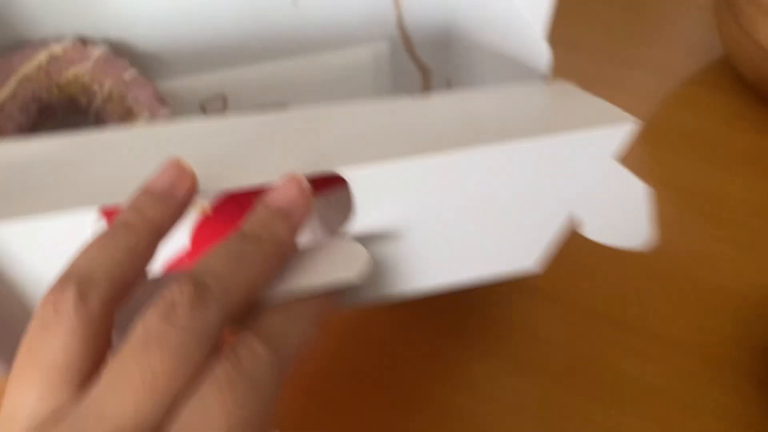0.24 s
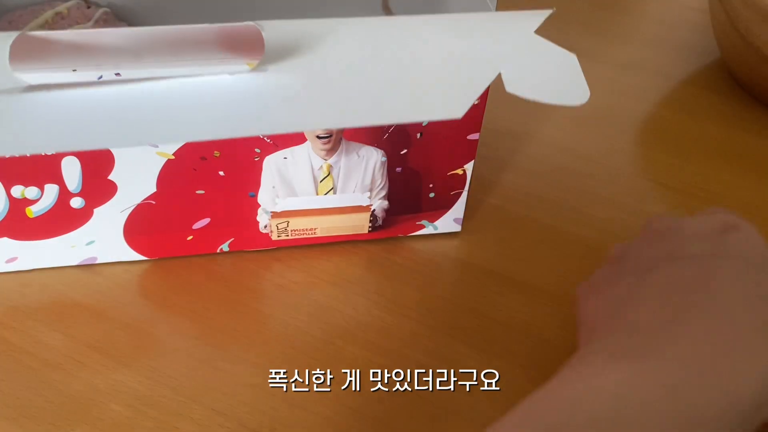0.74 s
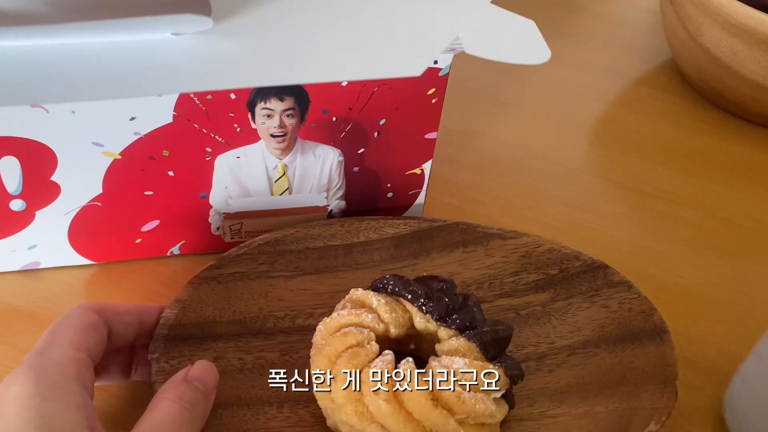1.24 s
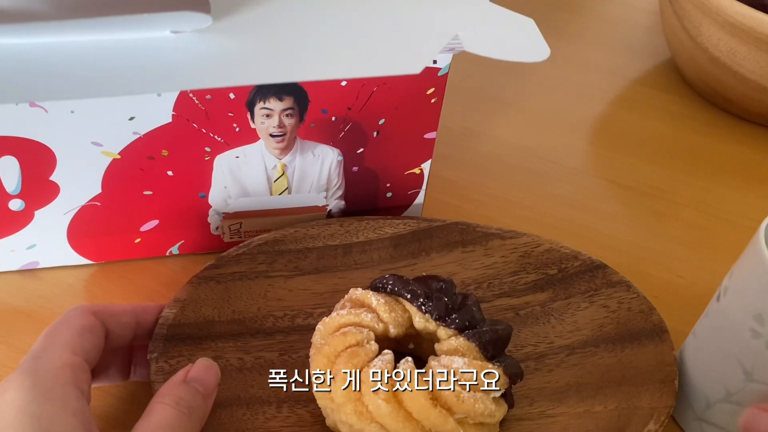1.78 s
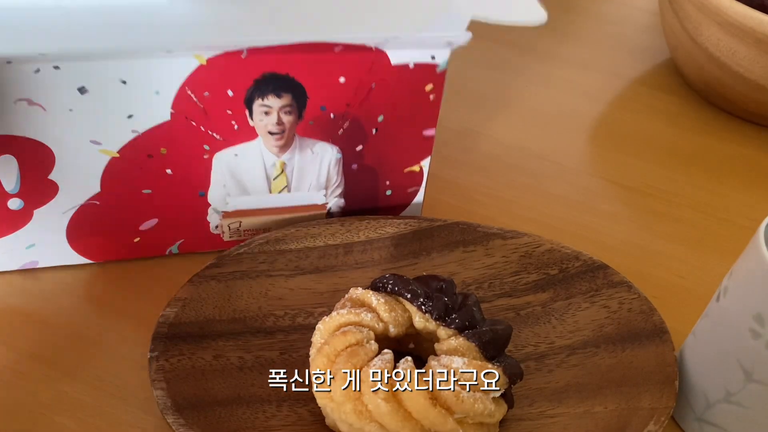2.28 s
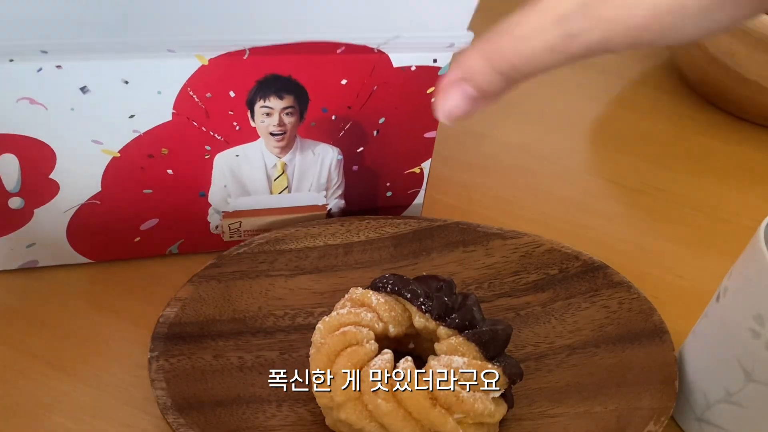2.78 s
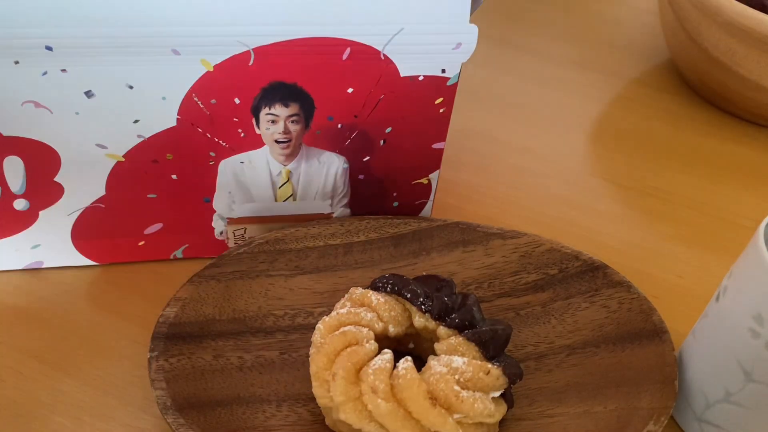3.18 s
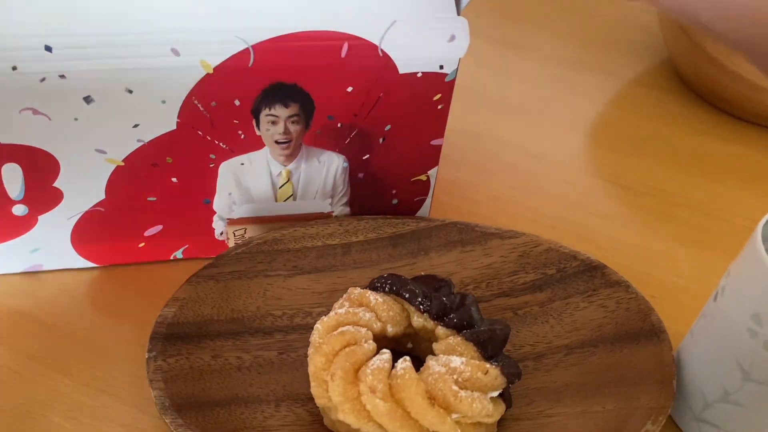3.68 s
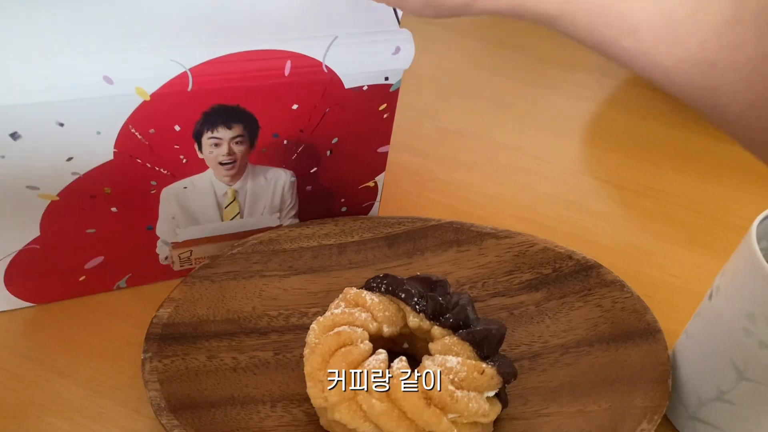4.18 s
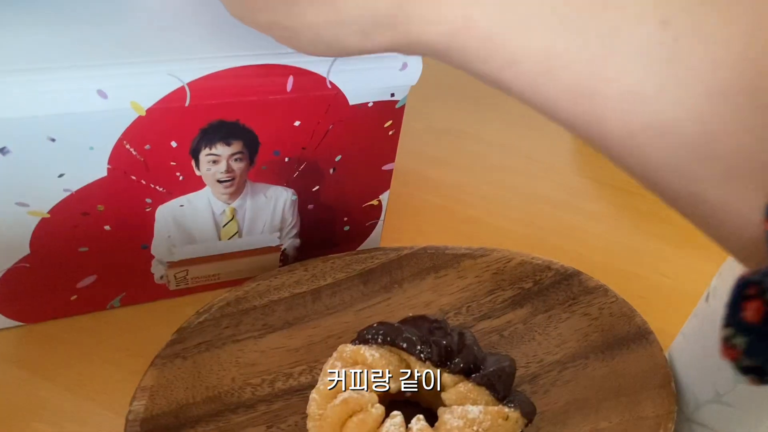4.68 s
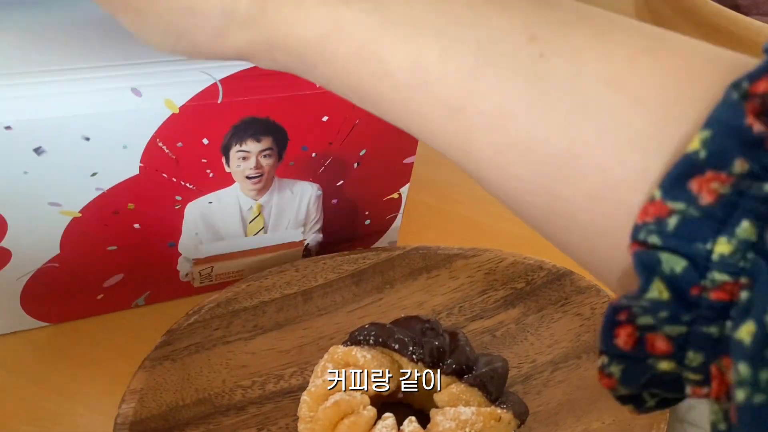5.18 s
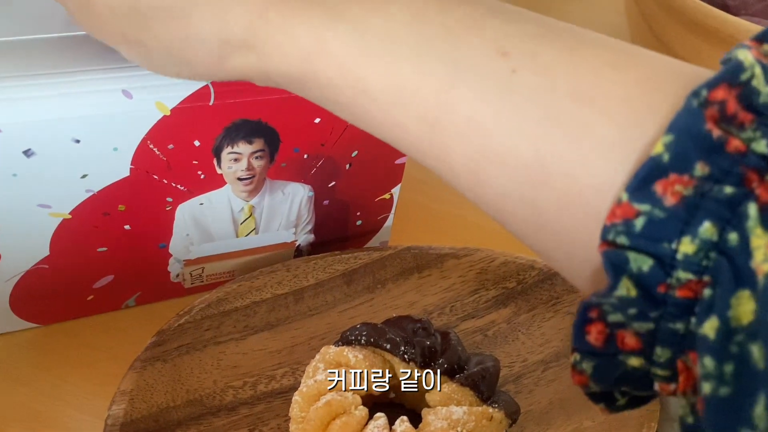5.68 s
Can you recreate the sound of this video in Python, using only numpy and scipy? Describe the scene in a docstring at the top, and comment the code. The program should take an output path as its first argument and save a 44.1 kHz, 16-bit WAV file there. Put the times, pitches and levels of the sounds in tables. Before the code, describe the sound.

Close indoor handling: light card taps and hiss, firm wooden knocks, a pause, then increasingly busy cardboard rustling, snapping and hollow bumps.

```python
"""A cardboard pastry box is folded shut on a wooden table, close to a hand-held phone in a small room.
Creases and taps excite its damped modes: stiff panels, hollow and sway. Fingers and card edges rub by
stick-slip noise, which also gives faint swelling hiss. Soft thumps and one small dull tap are damped tones.
Earlier a wooden plate and a cup are set down, as modal ringing with contact clicks. Early and late
reflections ring briefly over a low rumble of the grip and faint room air, both filtered noise."""
import sys
import numpy as np
from scipy import signal
from scipy.fft import rfft, irfft, next_fast_len
from scipy.io import wavfile
from scipy.ndimage import uniform_filter1d

SR = 44100
rng = np.random.default_rng(int(sys.argv[2]) if len(sys.argv) > 2 else 0)


def wav_out(sig):
    """Save sig, one row per channel (or a flat mono array), as 16-bit PCM at SR to the path in sys.argv[1]."""
    wavfile.write(sys.argv[1], SR, np.round(np.clip(np.atleast_2d(sig).T, -1, 1) * 32767).astype(np.int16))


N = 261513  # samples
TIME = np.arange(N) / SR  # s
RING = np.arange(SR // 2) / SR  # half a second, the span of every blow and echo pattern [s]
SIDES = np.array([[1], [-1]])  # left, right


def undb(db):
    """Logarithmic level: 20 dB is a tenfold amplitude."""
    return 10 ** (np.asarray(db) / 20)


def fade(t60):
    """Exponential free decay: the level falls 60 dB in t60 seconds."""
    return np.exp(-np.log(1000) * RING / max(t60, 1e-3))


def unit(x):
    """Energy normalisation: scale to rms 1."""
    return x / np.sqrt(np.mean(x ** 2))


def burst(x, db, size=882):
    """Short-time energy: the loudest stretch of `size` samples gets this rms level."""
    power = uniform_filter1d(np.mean(x ** 2, axis=0), size)
    return x * undb(db) / np.sqrt(power.max())


def pan(db):
    """Interchannel level difference: left and right gains that lie db apart."""
    return undb(db * SIDES / 2)


def pair(x, apart):
    """Interchannel coherence: a shared signal plus an unrelated one in opposite polarity."""
    return x[0] + apart * x[1] * SIDES


def colour(x, points):
    """Minimum-phase filtering: a causal response through (frequency [Hz], gain [dB]) points."""
    size = 2 * next_fast_len(x.shape[-1])
    half = size // 2
    hz, db = np.transpose(points)
    log_hz = np.log(np.arange(half + 1) * SR / size + 1)
    below = np.maximum(np.log(hz[0]) - log_hz, 0)
    above = np.maximum(log_hz - np.log(hz[-1]), 0)
    gain_db = np.interp(log_hz, np.log(hz), db)
    # outside the points the gain falls about 12 dB per octave
    cepstrum = irfft(np.log(undb(gain_db)) - 2 * (below + above))
    # folding the cepstrum forward in time makes the filter causal
    cepstrum[1:half] *= 2
    cepstrum[half + 1:] = 0
    response = np.exp(rfft(cepstrum))
    return irfft(rfft(x, size) * response)[..., :x.shape[-1]]


def walk(rate):
    """Slow random modulation: values held 1 / rate seconds, smoothed twice, with rms near 1."""
    hold = int(SR / rate)
    steps = np.repeat(rng.standard_normal(N // hold + 1), hold)
    smooth = uniform_filter1d(uniform_filter1d(steps, hold), hold)
    return unit(smooth[:N])


def ring(modes, detune, scatter_db, apart, length=1):
    """Modal superposition: each blow randomly shifts the strengths, signs and pitches of damped sines."""
    out = 0
    for hz, db, t60 in modes:
        shift, size, sign, turn = rng.standard_normal(4)
        phase = 2 * np.pi * hz * (1 + detune * shift) * RING + apart * turn * SIDES
        strength = np.sign(sign) * undb(db + scatter_db * size)
        onset = 1 - np.exp(-2 * hz * RING)
        out = out + strength * fade(t60 * length) * onset * np.sin(phase)
    return out


def crack(t60, points, apart):
    """High modal density: modes too crowded to tell apart sound as a quickly dying noise burst."""
    noise = pair(rng.standard_normal((2, len(RING))), apart)
    return colour(noise * fade(t60), points)


def add(track, s, sound):
    """Linear superposition: lay a sound on the track at s seconds."""
    start = max(int(s * SR), 0)
    track[:, start:start + sound.shape[1]] += sound[:, :N - start]


# sway of the box on the table, its hollow and its stiff panels, before random scatter:
# (frequency [Hz], relative level [dB], t60 [s])
BOX_SWAY_MODES = [(64, -8, 0.16), (98.8, -4.5, 0.13), (135, -1.5, 0.18), (179, -12, 0.14)]
BOX_HOLLOW_MODES = [(247, -13, 0.12), (324.7, -1.5, 0.11), (368.2, -3, 0.088), (436.7, 2.5, 0.079),
                    (548, 0.5, 0.054), (625, -8, 0.078)]
BOX_PANEL_MODES = [(730, -12, 0.095), (870, -4.5, 0.044), (1037, 0.5, 0.03), (1246, -5.5, 0.019),
                   (1560, -7, 0.0053), (1618, 6.5, 0.02), (2052, -7.5, 0.037), (2307, -5.5, 0.016)]
# dense, dead response of flat card, and spectrum of a snap: (frequency [Hz], gain [dB])
CARD_SLAP = [(400, 2), (700, 3.5), (1050, 7), (1400, -5), (1700, -8.5), (2400, 0), (3200, -12)]
CARD_SNAP = [(500, -17), (1000, -11), (2400, 5), (3100, 1.5), (3800, 2), (5500, -5.5), (8000, -5.5),
             (12000, -11), (16000, -16.5)]


def box_blow(snap_db, panel_db, flat_db, hollow_db, sway_db, crumple):
    """Impulsive excitation: a swelling cluster of tiny snaps drives panels, hollow and whole box."""
    age = RING / max(crumple, 1e-4)  # in contact times
    fibres = pair(rng.standard_normal((2, len(RING))), apart=0.75)
    fibres = fibres * undb(1.75 * rng.standard_normal(len(RING)))
    # ragged clumps: random levels at 675 points per second
    clumps = np.interp(RING * 675, np.arange(1000), rng.standard_normal(1000))
    cluster = fibres * undb(3 * clumps) * np.sqrt(age) * np.exp(-age)
    snap = burst(colour(cluster, CARD_SNAP), snap_db + 1.5, size=256)
    # flatness trades panel ring for slap
    panel = ring(BOX_PANEL_MODES, detune=0.07, scatter_db=3.0, apart=0.88)
    panel = burst(panel, panel_db - 0.5 - flat_db / 2, size=512)
    slap = burst(crack(0.034, CARD_SLAP, apart=0.75), panel_db - 3 + flat_db / 2, size=512)
    hollow = burst(ring(BOX_HOLLOW_MODES, detune=0.043, scatter_db=0.5, apart=0.4), hollow_db)
    sway = burst(ring(BOX_SWAY_MODES, detune=0.09, scatter_db=2.0, apart=0.18), sway_db + 1)
    push = 1 - np.exp(-age)  # a slow crease loads the panels gently
    heave = 1 - np.exp(-(age / 0.77) ** 2)  # hollow and sway build up more gradually at first
    return snap + push * (panel + slap) + heave * (hollow + sway)


# creases giving way; nominal levels, before the trims in box_blow:
# (time [s], snap level [dB], panel level [dB], crumple time [s])
CREASE_EVENTS = [(2.18, -53, -42.5, 0.0036), (2.203, -41, -40, 0.0031), (2.2239, -31.5, -34, 0.0018),
                 (2.264, -31.5, -35.5, 0.0013), (3.238, -42.5, -41.5, 0.0025), (3.498, -51, -48.5, 0.0045),
                 (3.906, -34, -22, 0.0072), (3.946, -39, -30.5, 0.0058), (4.068, -53.5, -41, 0.0046),
                 (4.444, -41.5, -46, 0.0027), (4.988, -49.5, -38.5, .0038), (5.178, -36, -28, 0.0048),
                 (5.393, -44, -52, 0.0012), (5.457, -55, -60, .0014), (5.511, -35.5, -36.5, .0025),
                 (5.523, -30.5, -38, 0.0023), (5.55, -39.5, -33, 0.013), (5.698, -40.5, -49, 0.0031),
                 (5.821, -38.5, -46, 0.0078), (5.8346, -27.5, -40.5, 0.0014)]


def creases():
    """Buckling: card gives way suddenly with a snap, and the box answers."""
    out = np.zeros((2, N))
    for s, snap_db, box_db, crumple in CREASE_EVENTS:
        blow = box_blow(snap_db, box_db, flat_db=3, hollow_db=box_db - 2, sway_db=box_db - 9.5,
                        crumple=crumple)
        add(out, s, blow * pan(6.5))
    return out


# fingers and flaps striking the box; nominal levels, before the trims in box_blow:
# (time [s], hollow level [dB], hardness = panels over hollow [dB],
#  flatness = slap over panel ring [dB], contact time [s])
TAP_EVENTS = [(0.2929, -38.5, 7, 9.5, 0.00045), (0.34, -41.5, -11, 1, 0.0016), (2.949, -41.5, -3, 0, 0.005),
              (3.0949, -36, 2, 11, 0.0017), (3.6392, -26, -2.5, 5, 0.0035), (3.8869, -31.5, -6, 2, 0.0022),
              (3.926, -27, -7.5, 6, 0.0067), (4.274, -30.5, 3.5, 3, 0.0012),
              (4.335, -26.5, -11.5, -1, 0.0013), (4.397, -31, -5, 6, 0.0033),
              (4.548, -36.5, -7.5, -14, 0.0031), (4.582, -37.5, -6.5, 6, 0.0028),
              (4.883, -37, -3, -8, 0.0033), (4.908, -26, -11, -11, 0.0047), (5.2134, -19, -5, -4, 0.0024),
              (5.229, -23.5, -5.5, -12.5, 0.001), (5.626, -30, -2, 3, 0.0043), (5.788, -30.5, -13, 4, 0.01)]


def taps():
    """Contact stiffness: the harder the tap, the more it sounds the panels against the hollow."""
    out = np.zeros((2, N))
    for s, hollow_db, hardness_db, flat_db, contact in TAP_EVENTS:
        panel_db = hollow_db + hardness_db
        blow = box_blow(panel_db - 7.5, panel_db, flat_db, hollow_db, hollow_db - 12, contact)
        add(out, s, blow * pan(4.5))
    return out


def wander(x, depth_db):
    """Time-varying transfer: resonances randomly come and go across frequency and time."""
    cells = signal.stft(x, nperseg=512)[2]
    field = rng.standard_normal(cells.shape[1:])
    for _ in range(2):
        field = uniform_filter1d(field, size=7, axis=0)  # across frequency
        field = uniform_filter1d(field, size=9, axis=1)  # across time
    return signal.istft(cells * undb(depth_db * unit(field)))[1][:, :N]


def friction(points, slips_per_s, grain_db, smooth, flutter_db, apart):
    """Stick-slip friction: many small random releases over a smooth scrape, with a fluttering level."""
    slips = (rng.random((2, N)) < slips_per_s / SR) * rng.choice([-1, 1], (2, N))
    sizes = np.minimum(rng.exponential(size=(2, N)), 4)
    slips = slips * undb(grain_db * sizes)
    scrape = unit(slips) + smooth * rng.standard_normal((2, N))
    moving = wander(colour(pair(scrape, apart), points), depth_db=2.0)
    return unit(moving * undb(flutter_db * walk(45)))


def swell(s, length, swell_db):
    """Amplitude envelope: the sound takes hold, swells or eases, and lets go."""
    along = (TIME - s) / length
    hold = np.clip(along / 0.14, 0, 1)
    release = np.clip(1 - (along - 1) / 0.34, 0, 1) ** 2  # dies away past the nominal length
    return hold * release * undb(swell_db * (np.clip(along, 0, 1) - 0.5))


# drone in the hollow, rasp of card edges, hiss, and single paper fibres letting go:
# (frequency [Hz], gain [dB])
DRAG_SPECTRUM = [(130, -10), (250, 1), (340, 1.5), (460, 1.5), (650, -10), (900, -15.5), (1400, -26.5)]
RASP_SPECTRUM = [(500, -21), (900, 10.5), (1300, -8), (1650, 4), (2400, 0), (3000, -1.5), (3900, -6.5),
                 (5200, -5.5), (8000, -35)]
HISS_SPECTRUM = [(2500, -2), (4500, -0.5), (6000, -5), (7500, -1.5), (10000, -5), (13000, -7),
                 (16000, -7.5)]
CRINKLE_SPECTRUM = [(600, -2), (1100, 19), (2400, -0.5), (3800, 5.5), (5500, -7), (8000, -4), (16000, -28)]
# faint hiss swelling and fading, and strokes of skin or card over card:
# (time [s], length before release [s], mid-way rasp level [dB], mid-way hiss level [dB],
#  swell from start to end [dB])
HISS_AND_STROKES = [(-.04, 0.39, -63, -51, -5), (0.427, .36, -69, -71.5, -2), (0.92, 0.18, -58.5, -68.5, 6),
                    (1.121, 0.037, -56, -54.5, 11), (1.17, 0.17, -75, -79, 7),
                    (2.531, 0.044, -60.5, -74, -9), (2.685, 0.17, -69, -62.5, 2),
                    (2.933, 0.1, -61.5, -54.5, -2), (3.182, 0.16, -62.5, -58.5, 0),
                    (3.425, 0.32, -60.5, -63, 11), (3.767, 0.16, -71.5, -61.5, 23),
                    (3.918, 0.16, -49, -53.5, -23), (4.2, 0.16, -49, -57, 1.5), (4.507, 0.13, -83, -57, 2),
                    (4.681, 0.06, -58, -54.5, 2), (4.842, 0.093, -54, -60, 11),
                    (4.957, 0.29, -48, -55.5, 3.5), (5.163, 0.017, -52, -44, 5),
                    (5.543, 0.063, -53, -44, -12), (5.718, 0.031, -51.5, -61, 2),
                    (5.792, 0.14, -52, -55.5, 8)]
# how hard the hands press while folding the box shut: (time [s], reference level [dB])
HAND_PRESSURE = [(2.53, -54.5), (2.73, -59.5), (3.1, -46.5), (3.29, -59), (3.5, -54), (3.77, -55),
                 (3.85, -46.5), (4.32, -55.5), (4.42, -43.5), (4.67, -50), (4.93, -60), (5.08, -42),
                 (5.14, -53), (5.29, -70), (5.56, -39), (5.7, -48.5), (5.93, -46.5)]


def rubbing():
    """Frictional excitation: card hisses, rasps, crinkles and drones; faint hiss also swells and fades."""
    drag = friction(DRAG_SPECTRUM, slips_per_s=200, grain_db=3.0, smooth=0.66, flutter_db=-0.2, apart=0.44)
    rasp = friction(RASP_SPECTRUM, slips_per_s=900, grain_db=2.0, smooth=1.0, flutter_db=3.0, apart=0.97)
    hiss = friction(HISS_SPECTRUM, slips_per_s=1900, grain_db=3.0, smooth=1.5, flutter_db=2.0, apart=0.91)
    crinkle = friction(CRINKLE_SPECTRUM, slips_per_s=80, grain_db=1.0, smooth=0, flutter_db=3.0, apart=0.48)
    rasping, hissing = 0, 0
    for s, length, rasp_db, hiss_db, swell_db in HISS_AND_STROKES:
        gain = swell(s, length, swell_db)
        rasping = rasping + gain * undb(rasp_db)
        hissing = hissing + gain * undb(hiss_db)
    folding = TIME >= HAND_PRESSURE[0][0]  # folded card crinkles too
    press = folding * undb(np.interp(TIME, *np.transpose(HAND_PRESSURE)))
    edges = rasp * pan(3.0) + folding * undb(-8) * crinkle * pan(5.9)
    # the listed swells and the resting hands add in power
    drag_gain = np.hypot(rasping * undb(1.5), press * undb(-1.5))
    edge_gain = np.hypot(rasping, press * undb(-11.5))
    hiss_gain = np.hypot(hissing, press * undb(-15))
    return drag * pan(3.2) * drag_gain + edges * edge_gain + hiss * pan(5.0) * hiss_gain


# plate and table top, before random scatter and each landing's damping:
# (frequency [Hz], relative level [dB], nominal t60 [s])
WOOD_MODES = [(88, -11, .2), (135, -4, .3), (240, -1, .14), (272, 3, .14), (310, 1, .2), (395, -3, .2),
              (465, -2, .22), (603, -4, .2), (689, -4, .18), (790, -5, .14), (851, 0, .22), (928, 1, .18),
              (1035, -2, .15), (1110, -2, .2), (1211, -2, .2), (1310, -7, .12), (1410, -7, .18),
              (1513, -7, .2), (1626, -8, .2), (1765, -7, .2), (1863, -8, .14)]
# dense, quickly damped modes of the wood: (frequency [Hz], gain [dB])
WOOD_SPECTRUM = [(400, -33), (600, 1.5), (900, 0), (1250, -0.5), (1750, -10), (2200, -18), (2700, -17),
                 (3400, -32)]


def landing(wood_db, thump_db, length):
    """Modal excitation by impact: one contact rings the plate and thumps the table top."""
    top = [mode for mode in WOOD_MODES if mode[0] < 530]
    plate = [mode for mode in WOOD_MODES if mode[0] >= 530]
    thump = ring(top, detune=0.034, scatter_db=-1.5, apart=0.078, length=0.8 * length)
    tone = ring(plate, detune=0.011, scatter_db=1.0, apart=0.97, length=1.48 * length)
    wood = crack(0.019, WOOD_SPECTRUM, apart=0.7)
    return burst(thump, thump_db + 0.5) + burst(tone, wood_db - 8.5) + burst(wood, wood_db - 0.5)


def damped_tone(hz, db, t60):
    """Single-degree-of-freedom oscillation: one short sine sets in softly and decays."""
    onset = 1 - np.exp(-hz * RING)
    return burst(np.sin(2 * np.pi * hz * RING) * onset * fade(t60) * pan(3.2), db)


# plate, cup and box landing on the table; wood level is nominal, before the trims in landing:
# (time [s], wood level [dB], click level [dB], ring time as a nominal share of the modes' t60 [1],
#  left minus right [dB])
LANDINGS = [(0.7186, -53.5, -52.5, 0.36, 0), (0.841, -52.5, -54, 0.22, -5), (0.849, -47, -43.5, 0.17, 6),
            (0.86, -31, -41.5, 0.54, 1.5), (1.3485, -17, -35.5, 0.32, 1), (1.386, -30.5, -56, 1, 3),
            (1.5324, -25.5, -56, 0.38, 1.5), (1.9622, -43.5, -66, 0.27, 4), (4.277, -29, -41, 0.68, 0),
            (5.233, -41, -45, 0.49, -8)]
# click of contact: (frequency [Hz], gain [dB])
CLICK_SPECTRUM = [(1500, -27), (2600, -1.5), (3400, -8), (3900, -1), (4600, -13), (5200, -7.5),
                  (6500, -17.5), (10000, -22), (16000, -30)]


def knocks():
    """Repeated impact: each thing lands with a click, then rocks once onto its far edge, softer."""
    out = np.zeros((2, N))
    for s, wood_db, click_db, length, pan_db in LANDINGS:
        # softer landings are more thump than ring
        thump_db = wood_db + 0.18 * (-24 - wood_db)
        click = burst(crack(0.015, CLICK_SPECTRUM, apart=0.56), click_db, size=220)
        add(out, s, (landing(wood_db, thump_db, length) + click) * pan(pan_db))
        # a landing also swings the whole table
        add(out, s, damped_tone(hz=75, db=thump_db - 18, t60=0.15))
        rock = landing(wood_db - 2.5, thump_db - 3, length)
        add(out, s + 0.009, rock * pan(pan_db))
    return out


# ringing of the cup: (frequency [Hz], level [dB], t60 [s])
CUP_RING_MODES = [(3930, -42.5, 0.029), (4400, -46, .012)]


def cup_tick():
    """Free vibration: the cup ticks once as it settles."""
    out = np.zeros((2, N))
    add(out, 1.4497, ring(CUP_RING_MODES, detune=0, scatter_db=0, apart=0))
    return out


# soft low thumps and one small dull tap: (time [s], frequency [Hz], level [dB], t60 [s])
SOFT_THUMPS = [(0.343, 70, -42, 0.1), (0.346, 190, -37, 0.053), (0.72, 64.4, -52, 0.14),
               (1.704, 460, -49, 0.041), (2.205, 62.5, -57, 0.22), (2.661, 68, -40.5, 0.081),
               (2.952, 227, -44.5, 0.067), (3.1, 58.3, -39.5, 0.15), (3.182, 249, -46.5, .1),
               (3.285, 65, -43.5, 0.15), (3.506, 55.4, -38, 0.11), (3.66, 76, -38.5, 0.22),
               (3.895, 70.4, -27, 0.057), (3.932, 102, -35.5, 0.18), (5.186, 140, -30, 0.034),
               (5.392, 91.7, -42, 0.072)]


def soft_thumps():
    """Damped oscillation: soft low thumps and one small dull tap, each a short tone without a click."""
    out = np.zeros((2, N))
    for s, hz, db, t60 in SOFT_THUMPS:
        add(out, s, damped_tone(hz, db, t60))
    return out


# rumble of the hand that holds the phone, before an overall 5 dB lift: (time [s], level [dB])
GRIP_LEVELS = [(0.0, -59), (0.36, -56), (0.59, -60), (2.49, -54.5), (2.71, -61.5), (3.15, -48.5),
               (3.34, -60), (3.58, -52.5), (3.8, -54), (4.36, -47.5), (4.76, -50.5), (5.09, -51.5),
               (5.93, -53)]
# rumble of the grip: (frequency [Hz], gain [dB])
RUMBLE_SPECTRUM = [(22, -32), (35, -11.5), (52, 2.5), (75, -1.5), (110, -3.5), (160, -4), (230, -11),
                   (400, -25)]


def grip_rumble():
    """Structure-borne sound: the grip rumbles through the phone's body as low, uneven noise."""
    noise = pair(rng.standard_normal((2, N)), apart=0.19)
    rumble = unit(colour(noise, RUMBLE_SPECTRUM)) * pan(1.8)
    return rumble * undb(np.interp(TIME, *np.transpose(GRIP_LEVELS)) + 5)


# air of the still room: (frequency [Hz], gain [dB])
AIR_SPECTRUM = [(25, 2.5), (55, -8), (120, -7), (300, -4), (500, -11.5), (1000, -13.5), (2000, -24.5),
                (5000, -33.5), (8000, -46.5), (16000, -42)]


def room_air():
    """Diffuse-field noise: the room murmurs faintly and steadily."""
    noise = pair(rng.standard_normal((2, N)), apart=1.0)
    return unit(colour(noise, AIR_SPECTRUM)) * pan(3.9) * undb(-59)


def room(x, early_db, late_db, early_t60, late_t60=0.72):
    """Reverberation: close reflections from table and walls, then a longer, duller tail."""
    out = x
    parts = [(early_db, early_t60, 0.004, -5), (late_db, late_t60, 0.02, -16)]
    for db, t60, onset, treble_db in parts:
        echoes = pair(rng.standard_normal((2, len(RING))), apart=0.7)
        echoes = echoes * fade(t60) * (1 - np.exp(-(RING / onset) ** 2))
        spectrum = [(60, -21.5), (400, -0.5), (1200, 2), (4000, -1.0), (16000, treble_db)]
        echoes = colour(unit(echoes) / np.sqrt(len(RING)), spectrum)
        out = out + undb(db) * signal.fftconvolve(x, echoes, axes=1)[:, :N]
    return out


def scene():
    """Direct-to-reverberant ratio: the table excites early echoes more than box or rubbed card does."""
    box = room(creases() + taps(), early_db=-7.5, late_db=-17.0, early_t60=0.15)
    card = room(rubbing(), early_db=-12.0, late_db=-20, early_t60=0.031)
    table = room(knocks() + cup_tick(), early_db=-6.0, late_db=-21.5, early_t60=0.3)
    return box + card + table + soft_thumps() + grip_rumble() + room_air()


def record(dry):
    """Transducer response: the phone's channels share their treble, left later, and it cuts both ends."""
    hz = np.fft.rfftfreq(N, 1 / SR)
    left, right = rfft(dry)
    shared = 0.995 / (1 + (6300 / (hz + 1)) ** 20)  # share of power, rising steeply near 6300 Hz
    lag = np.exp(-2j * np.pi * (hz - 6900) / 4270)  # delay of 1 / 4270 s, in phase at 6900 Hz
    treble = 0.62 * (left + right) * np.sqrt(shared) * np.array([lag, np.ones(len(hz))])
    both = irfft(np.array([left, right]) * np.sqrt(1 - shared) + treble, N)
    low_cut = signal.butter(4, 39, "high", fs=SR, output="sos")
    high_cut = signal.ellip(8, 0.2, 70, 15900, fs=SR, output="sos")
    return signal.sosfilt(high_cut, signal.sosfilt(low_cut, both))


dry = scene()
out = record(dry)
wav_out(out)
```